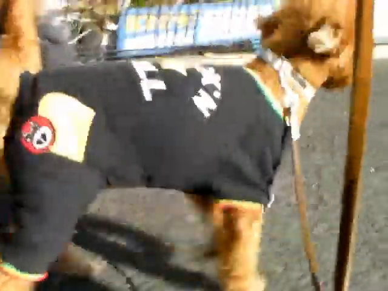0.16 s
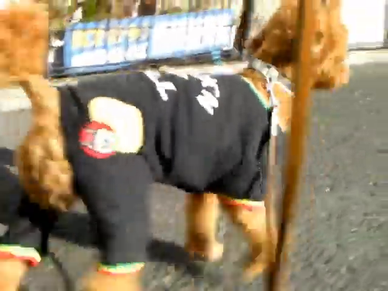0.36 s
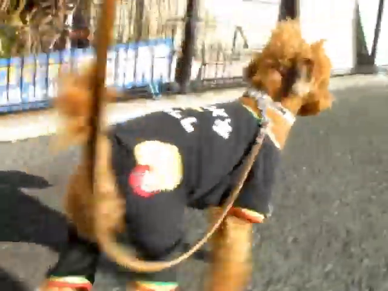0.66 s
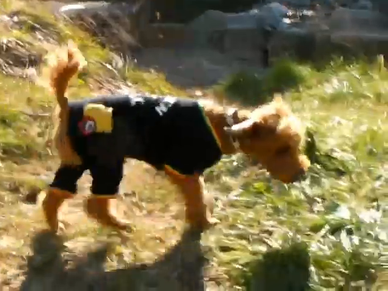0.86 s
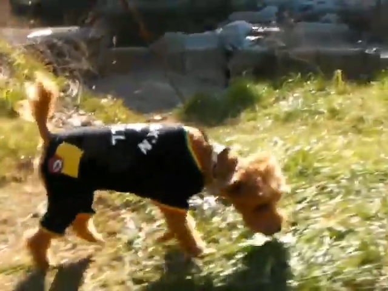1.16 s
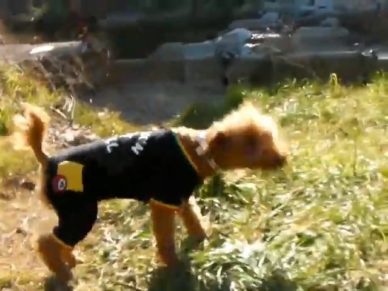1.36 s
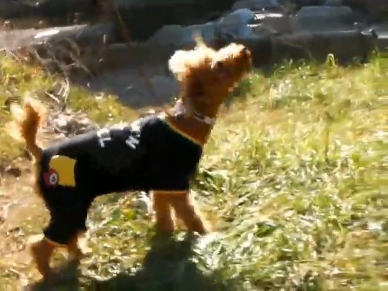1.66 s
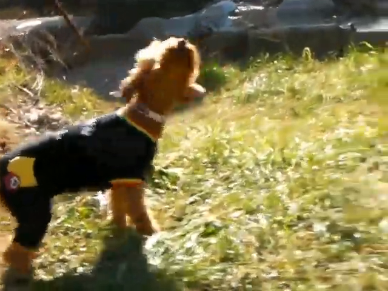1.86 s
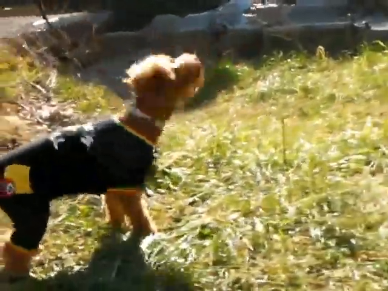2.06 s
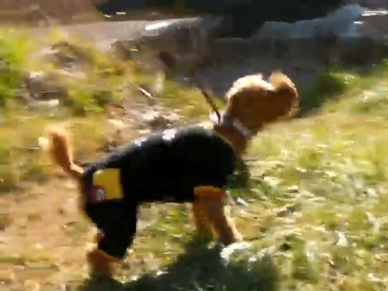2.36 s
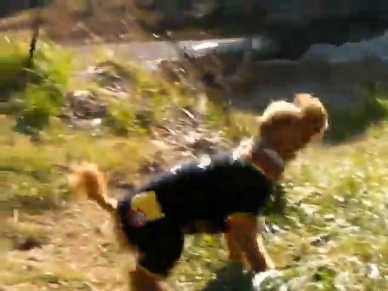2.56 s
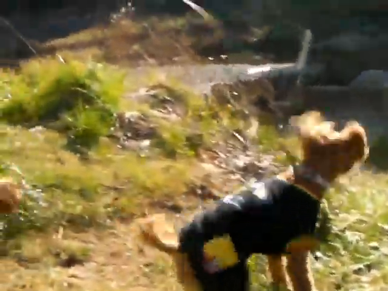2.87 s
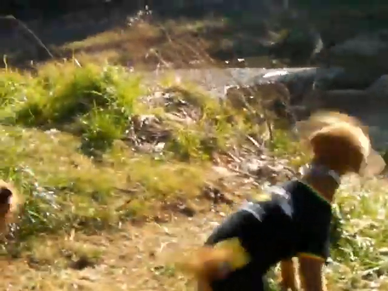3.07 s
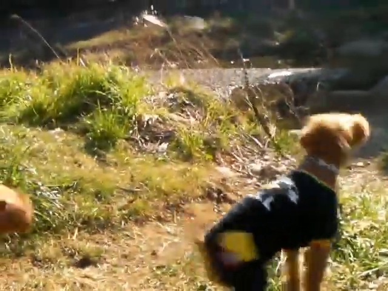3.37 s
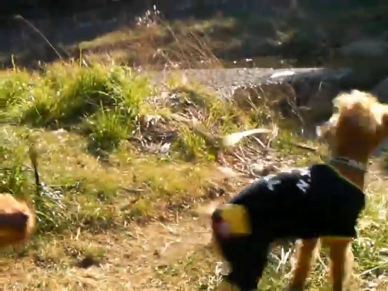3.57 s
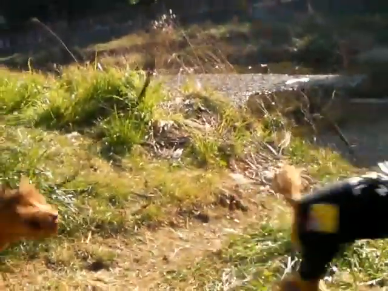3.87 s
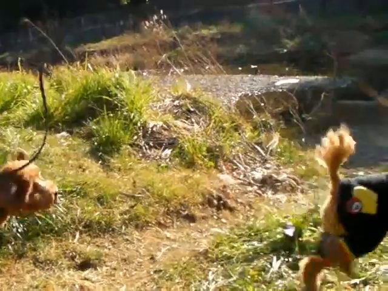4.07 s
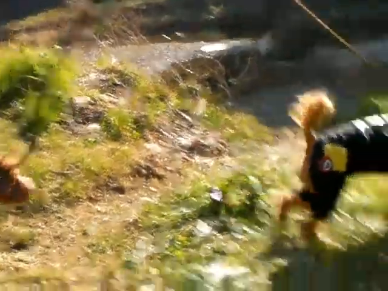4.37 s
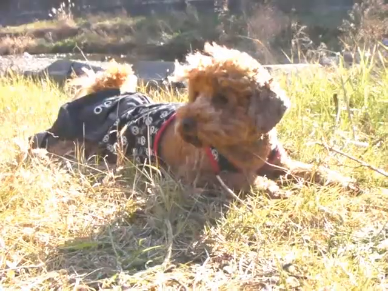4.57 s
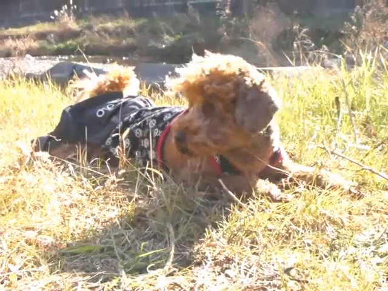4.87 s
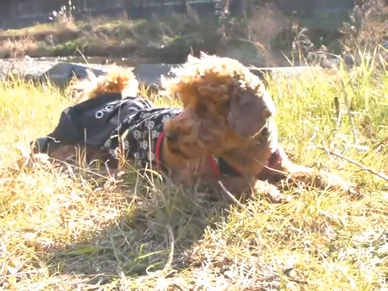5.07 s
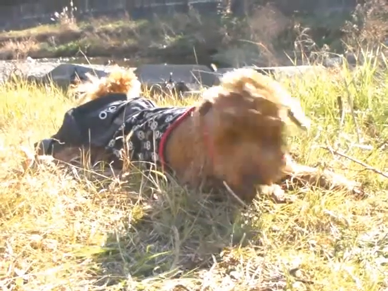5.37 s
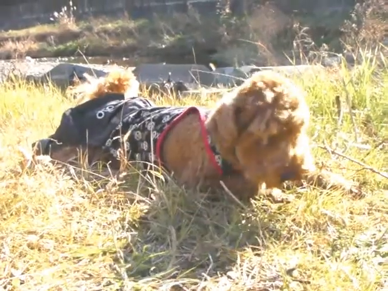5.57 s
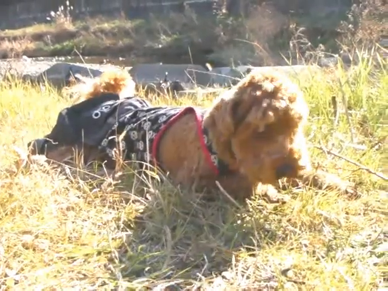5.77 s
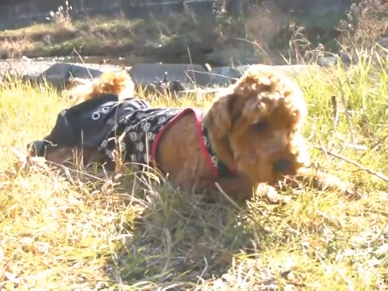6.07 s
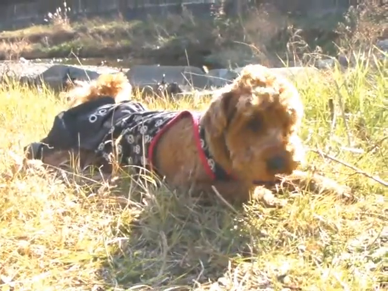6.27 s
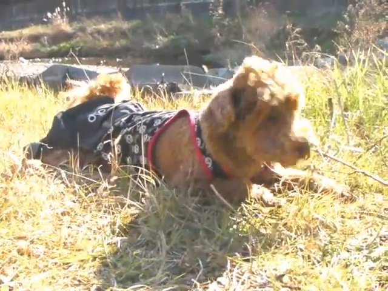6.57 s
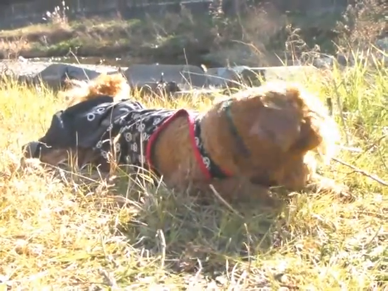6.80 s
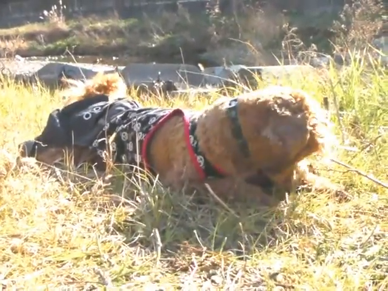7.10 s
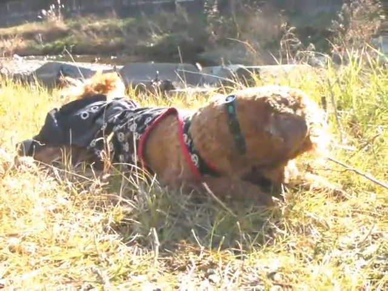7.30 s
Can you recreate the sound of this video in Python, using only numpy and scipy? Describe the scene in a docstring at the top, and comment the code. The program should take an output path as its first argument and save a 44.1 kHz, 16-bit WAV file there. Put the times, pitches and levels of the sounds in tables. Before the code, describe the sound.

Dogs' claws click on pavement, then dry grass and twigs rustle and snap with collar jingles, giving way to a softly flowing river.

```python
"""Dogs on a walk to the river

Dogs trot along a paved street, claws clicking over the traffic hum. With their walker they push through dry
grass and twigs by a river: blades rustle, stalks snap and ring, collar and leash rattle. The sound is muted
briefly and the scene changes to the bank, where a dog lies still while the water washes past with resonating
bubbles. The ports of a small microphone ring and notch all of it."""
import sys
import numpy as np
from scipy import signal
from scipy.fft import rfft, irfft
from scipy.io import wavfile
from scipy.ndimage import uniform_filter1d, map_coordinates

SR = 44100
rng = np.random.default_rng(int(sys.argv[2]) if len(sys.argv) > 2 else 0)


def master(y):
    """Save y as 16-bit WAV."""
    cut = np.clip(np.atleast_2d(y).T, -1, 1)
    pcm = np.round(cut * 32767)  # scale
    wavfile.write(sys.argv[1], SR, pcm.astype(np.int16))


N = 328104
T = np.arange(N) / SR
STREET_S, MEADOW_S, BANK_S = (0, .776), (.776, 4.444), (4.529, 7.44)  # start and end of each place
TWIGS_FROM_S = 2.3

# Claw clicks and breaking stalks: (t/s, f/Hz, then level/dB of the main modes, the dull click,
# the woody modes, the thin modes and the finest modes)
SNAP_EVENTS = [(0.0298, 5970, -36, -53, -59, -60, -65), (0.0503, 6140, -43, -43, -47, -48, -65),
               (0.0802, 6760, -36, -49, -40, -38, -45), (0.0953, 5640, -43, -43, -36, -39, -52),
               (0.1058, 6540, -33, -53, -57, -61, -53), (0.1322, 6760, -37, -46, -50, -37, -40),
               (0.1381, 6650, -37, -54, -42, -32, -32), (0.2716, 6480, -45, -54, -51, -50, -63),
               (0.2774, 6140, -36, -50, -31, -44, -49), (0.3278, 6750, -28, -52, -38, -24, -41),
               (0.341, 5640, -55, -57, -50, -42, -43), (0.4055, 5940, -43, -52, -35, -49, -59),
               (0.4659, 6740, -45, -41, -31, -41, -49), (0.4757, 6740, -38, -42, -41, -37, -37),
               (0.5288, 6720, -33.5, -48, -37, -33, -41), (0.6378, 6570, -28.5, -46, -29, -25, -34),
               (0.665, 6590, -48, -56, -38, -49, -58), (0.6788, 5750, -38, -43, -53, -69, -65),
               (0.7106, 6400, -33, -42, -41, -29, -48), (0.7263, 5800, -55, -58, -50, -38, -55),
               (0.7934, 6440, -34, -52, -44, -35, -56), (1.2634, 6780, -27, -46, -41, -36, -40),
               (1.2761, 6500, -25, -37, -37, -34, -40), (1.3045, 6470, -38, -44, -34, -39, -32),
               (1.3183, 6600, -37, -49, -42, -33, -25), (1.3393, 6240, -32, -50, -40, -43, -43),
               (1.7471, 6630, -34, -40, -37, -38, -38), (1.7893, 6590, -29.5, -33, -25, -41, -50),
               (1.8314, 6800, -31, -45, -43, -35, -45), (1.8925, 6460, -38, -36, -35, -27, -44),
               (1.9498, 6700, -27, -52, -36, -21, -37), (2.0066, 6300, -26, -52, -36, -39, -43),
               (2.0293, 6600, -22, -40, -27, -29, -44), (2.0915, 5880, -35, -55, -41, -38, -33),
               (2.2011, 6700, -14, -46, -30, -22, -32), (2.223, 6570, -18, -43, -36, -30, -33),
               (2.2642, 6120, -25, -40, -41.5, -42, -17), (2.2904, 6600, -26, -42, -40, -37, -43),
               (2.318, 6780, -25, -51, -43, -33, -36), (2.3496, 6050, -24, -55, -41, -35, -55),
               (2.3822, 6760, -18.5, -43, -31, -24, -18), (2.3992, 6590, -23, -49, -33, -32, -35),
               (2.4301, 6440, -26, -53, -37, -19, -14), (2.4682, 6570, -17, -43, -24, -28, -27),
               (2.4774, 6300, -26, -36, -33, -36, -37), (2.5117, 5640, -36, -54, -37, -56, -36),
               (2.5258, 6470, -29, -42, -49, -38, -29), (2.5842, 6370, -20, -45, -22, -34, -31),
               (2.5969, 6770, -20.5, -44, -39, -27, -37), (2.6256, 6400, -21, -42, -30, -33, -28),
               (2.6415, 6140, -18, -49, -35, -22, -48), (2.6481, 6300, -25, -39, -30, -20, -40),
               (2.6537, 6570, -30.5, -44, -34, -32, -38), (2.6786, 5620, -30, -51, -39, -29, -17),
               (2.6918, 6500, -20.5, -38, -28, -30, -23), (2.7008, 6060, -26, -54, -19, -42, -53),
               (2.7062, 6600, -25, -40, -25, -27, -18), (2.7177, 6500, -6.5, -39, -14, -19, -20),
               (2.728, 6300, -17, -40, -23, -26, -27), (2.7414, 6270, -27, -50, -43, -51, -55),
               (2.7803, 6420, -31, -43, -29, -35, -43), (2.7955, 6200, -22, -51, -30, -36, -38),
               (2.8323, 6220, -11.5, -39, -18, -6, -4), (2.8528, 6060, -14, -37, -15.5, -21, -23),
               (2.862, 6450, -24, -19.5, -27, -33, -33), (2.8766, 6300, -16, -37, -26, -27, -33),
               (2.9061, 6870, -20.5, -50, -28, -24, -28), (2.9217, 6230, -18, -50, -30, -27, -25),
               (2.9606, 6400, -23, -41, -47, -39, -39), (2.9767, 5660, -45, -22.5, -22, -52, -53),
               (3.011, 6600, -16, -43, -26, -30, -33), (3.0504, 6600, -20, -36, -25, -26, -30),
               (3.0853, 6520, -15.5, -53, -30, -27, -22), (3.0956, 6300, -6, -35, -24, -10, -9),
               (3.1032, 6220, -30, -34, -31, -32, -36), (3.1334, 6400, -19, -53, -29, -33, -37),
               (3.1556, 6100, -20, -48, -22, -31, -37), (3.161, 6300, -25, -35, -24, -35, -39),
               (3.1935, 6310, -19, -45, -35, -31, -29), (3.2015, 7000, -33, -47, -34, -29, -14),
               (3.2174, 6100, -18, -18, -12, -36, -45), (3.2374, 6600, -29, -37, -48, -13, -31),
               (3.264, 6590, -36, -55, -48, -32, -25), (3.2753, 6560, -7.5, -39, -29, -19, -19),
               (3.3139, 6370, -21.5, -44, -27, -27, -37), (3.3191, 5620, -34, -27, -29, -36, -31),
               (3.3537, 6200, -21, -36, -19.5, -24, -16), (3.3588, 6350, -22, -47, -33, -34, -28),
               (3.386, 6540, -22, -22, -20, -38, -36), (3.39, 6330, -22, -35, -29, -20, -22),
               (3.4208, 6760, -19, -38, -26, -19, -33), (3.4363, 6260, -8, -29, -8.5, -6, -15),
               (3.4866, 6550, -10.5, -39, -28, -11, -14), (3.4985, 6310, -25, -48, -37, -39, -39),
               (3.5439, 6300, -15, -10.5, -7, -23, -23), (3.5489, 6700, -12, -22, -17, -28, -15),
               (3.6263, 6930, -9.5, -32, -16, -13, -14), (3.6657, 6270, -29, -53, -48, -30, -31),
               (3.7018, 6630, -24.5, -34, -22, -35, -43), (3.724, 6910, -32, -42, -21.5, -41, -46),
               (3.7541, 5660, -31, -28, -23, -51, -53), (3.7713, 6230, -22, -31, -27, -35, -28),
               (3.7866, 5620, -25, -36, -28, -29, -37), (3.8117, 6520, -7.5, -53, -32, -12, -12),
               (3.833, 6400, -20, -35, -28, -26, -26), (3.8407, 7000, -21, -42, -25, -21, -25),
               (3.9105, 6200, -24.5, -42, -25, -34, -48), (3.9704, 5990, -36, -42, -32, -34, -12),
               (3.9802, 6900, -23.5, -41, -27, -25, -16), (3.999, 6400, -42, -44, -37, -22, -37),
               (4.048, 6590, -7, -31, -12, -9, -13), (4.2222, 6460, -35, -42, -39, -47, -55),
               (4.2336, 6350, -29, -47, -33, -28, -47), (4.3322, 6700, -29, -54, -47, -50, -52),
               (4.3379, 6670, -26.5, -57, -26, -42, -46), (4.3941, 6530, -27, -58, -33, -33, -48),
               (4.8735, 6350, -40, -44, -49, -65, -68), (5.1913, 6070, -41, -61, -51, -61, -65),
               (5.2976, 6040, -46, -48, -41, -65, -65), (5.7452, 6640, -39, -54, -28, -60, -64),
               (6.1244, 6000, -48, -48, -42, -65, -65), (6.3778, 5900, -48, -46, -38, -65, -67),
               (6.9931, 6200, -55, -59, -42, -65, -65), (7.1244, 6240, -40, -54, -42, -57, -65)]


def undb(db):
    """Amplitude ratio of a level in decibels."""
    return 10 ** (np.asarray(db) / 20)


def unit(x):
    """Normalisation to an RMS of one."""
    return x / np.sqrt(np.mean(x ** 2))


def band(x, lo_hz, hi_hz, order=2):
    """Butterworth band-pass filter."""
    return signal.sosfilt(signal.butter(order, [lo_hz, hi_hz], "band", fs=SR, output="sos"), x)


def curve(table):
    """Linear interpolation of (t/s, value) rows at every sample."""
    return np.interp(T, *np.transpose(table))


def on_log_hz(hz, table, column=1):
    """Interpolation of one column over logarithmic frequency."""
    table = np.array(table)
    return np.interp(np.log(hz + 1), np.log(table[:, 0]), table[:, column])


def add(out, s, sound):
    """Superposition: mix a sound in at time s."""
    i = int(s * SR)
    out[..., i:i + sound.shape[-1]] += sound[..., :N - i]


def ring(modes, hz_scale=1., size=SR // 4):
    """Free vibration: a sum of damped sines, one for each mode (f/Hz, level/dB, T60/s)."""
    t = T[:size]
    return sum(undb(db - 60 * t / t60) * np.sin(2 * np.pi * hz * hz_scale * t) for hz, db, t60 in modes)


def attack(rise_s, size=SR // 4):
    """Linear onset of a vibration."""
    return np.minimum(T[:size] / rise_s, 1)


def wash(spectrum, patchy_db, patch_s, left_lag_samples=0.):
    """Distant sound field: partly coherent stereo noise whose third-octave bands fluctuate separately."""
    hz, s, noise = signal.stft(rng.standard_normal((2, N)), SR, nperseg=1024)
    coherence = on_log_hz(hz, spectrum, column=2)[:, None]
    mid, side = noise[0] * np.sqrt(1 + coherence), noise[1] * np.sqrt(1 - coherence)
    grid = np.meshgrid(3 * np.log2(hz / 20 + 1), s / patch_s, indexing="ij")
    patches = map_coordinates(rng.standard_normal((40, 400)), grid, order=1, mode="wrap")
    gain = undb(on_log_hz(hz, spectrum)[:, None] + patchy_db * patches)
    delay = np.exp(-2j * np.pi * hz * left_lag_samples / SR)[:, None]
    out = signal.istft(np.array([(mid + side) * delay, mid - side]) * gain, SR, nperseg=1024)[1][:, :N]
    return out / band(out.mean(0), 60, 1500).std()


def street():
    """Traffic hum: broadband noise with a slowly modulated bass."""
    # Distant street noise: (f/Hz, relative level/dB, left-right coherence)
    spectrum = [(20, -32, .6), (55, -9, 0.4), (118, 3.5, 1), (192, -5.5, 0.88), (346, -2, 0.97),
                (1030, -6, 0.94), (1970, -13, 0.89), (3360, -21.5, 0.35), (6960, -29, 0), (12400, -36.5, 0),
                (13600, -70, .2)]
    # Gain of the traffic bass: (t/s, level/dB)
    rumble = [(0, -1), (.3, -2), (.4, 2.5), (.58, 2), (.64, 6.5), (.776, 5.5)]
    hum = wash(spectrum, patchy_db=0.88, patch_s=0.076)
    bass = signal.sosfilt(signal.butter(2, 300, fs=SR, output="sos"), hum)
    return (hum + (undb(curve(rumble)) - 1) * bass) * undb(-40)


def meadow():
    """At a distance the river's many sources merge into noise, which fades slightly along the way."""
    # The river across the grass: (f/Hz, relative level/dB, left-right coherence)
    spectrum = [(20, -46, 0.59), (55, -5, 0.99), (107, -6, .85), (200, 2, 0.96), (312, 2.5, 0.99),
                (385, -6.5, 0.89), (996, -8, 0.87), (2700, -15, 0.8), (5860, -19, 0.11),
                (12800, -30.5, 0.081), (14200, -72, .2)]
    return wash(spectrum, patchy_db=2.0, patch_s=.07) * undb(np.interp(T, MEADOW_S, [-40, -41.5]))


def bubbles(count, size_db, cycles, lo_hz, hi_hz):
    """Bubble resonance: each air bubble is a damped oscillator whose pitch rises as it surfaces."""
    out = np.zeros((2, N))
    for when, pitch, size, pan in rng.random((count, 4)):
        hz = lo_hz * (hi_hz / lo_hz) ** pitch
        periods = np.arange(int(3 * cycles * SR / hz)) * hz / SR
        envelope = np.minimum(periods, 1) * np.exp(-2 * periods / cycles)
        blip = envelope * np.sin(2 * np.pi * periods * (1 + 0.05 * periods / cycles))
        gain = undb(-size_db * np.log(1 - .97 * size)) * (lo_hz / hz) ** .5
        add(out, when * N / SR, gain * np.outer([pan + 1, 2 - pan], blip))
    return unit(out)


def river_bank():
    """Flow noise reaches the right port first; bubbles resonate in it, the smallest as a high fizz."""
    # Water passing the bank: (f/Hz, relative level/dB, left-right coherence)
    spectrum = [(20, -44, .9), (53.7, -5.5, 0.93), (127, 2, 0.99), (274, -6.5, 0.91), (794, -11, 0.88),
                (1090, -14, 0.86), (2590, -19, 0.94), (4770, -22, 0.34), (6830, -26, 0.75),
                (7600, -30.5, 0.63), (7700, -23, 0.34), (12520, -40, 0.24), (13800, -71, .3)]
    # Swell and ebb of the river: (t/s, relative level/dB)
    flow = [(4.53, 0.5), (5.1, 0), (5.7, 0), (6.1, 0), (6.4, 0.5), (6.8, .5), (7.1, 0), (7.44, 0.5)]
    water = wash(spectrum, patchy_db=1.4, patch_s=0.066, left_lag_samples=2.24)
    babble = bubbles(count=1400, size_db=2.0, cycles=4.3, lo_hz=349, hi_hz=3000)
    fizz = bubbles(count=500, size_db=-1.0, cycles=8.6, lo_hz=3450, hi_hz=6450)
    return (water + undb(-11) * babble + undb(-20.5) * fizz) * undb(-45.5 + curve(flow))


def gurgles():
    """Each nearby gurgle of the water is a single damped resonance."""
    # Gurgles: (t/s, level/dB, f/Hz)
    events = [(5.914, -48, 520), (6.066, -37, 730), (6.329, -28, 696)]
    out = np.zeros(N)
    for s, db, hz in events:
        add(out, s, undb(db) * attack(0.004) * ring([(hz, 0, .035)]))
    return out


def crackle(break_chance, size_db, grain):
    """Noise modulated by random tiny breaks; the less grain (0-1), the more they merge into a swish."""
    breaks = (rng.random(N) < break_chance) * undb(size_db * np.minimum(rng.exponential(size=N), 3))
    envelope = unit(signal.lfilter([1], [1, -.93], breaks ** 2) ** .5)
    return (grain * envelope + 1 - grain) * rng.standard_normal((2, N))


def brushing_db():
    """Incoherent sources add in power: steady brushing plus single sweeps through the blades."""
    # Paws, shoes and leash brushing over ground and grass: (t/s, level/dB)
    steady = [(0, -72), (.77, -76), (.78, -56), (1.2, -45), (1.5, -48.5), (2.02, -50), (2.06, -68),
              (2.3, -41.5), (2.45, -50), (2.7, -47), (2.88, -35.5), (3.15, -46), (3.4, -41), (3.52, -48.5),
              (3.6, -40), (3.9, -46), (4.1, -57), (4.44, -55)]
    # Sweeps: (peak t/s, level/dB, 20 dB rise time/s, 20 dB fall time/s)
    sweeps = [(.112, -50, 0.06, 0.066), (.42, -52.5, 0.078, 0.46), (.87, -40.5, 0.077, 0.027),
              (1.01, -35.5, 0.097, 0.28), (1.412, -50, 0.055, 0.03), (1.954, -40, 0.13, 0.068),
              (2.151, -22, 0.053, 0.11)]
    power = undb(curve(steady)) ** 2
    for s, db, rise_s, fall_s in sweeps:
        below_peak_db = 20 * np.where(T < s, ((s - T) / rise_s) ** 2, (T - s) / fall_s)
        power += undb(db - below_peak_db) ** 2
    return 10 * np.log10(power)


def rustle():
    """Friction noise through the meadow, ending as the scene changes: bright crackle, deeper crunch, a dull
    rush of fur and legs."""
    # Dry blades rubbing: (f/Hz, relative level/dB, left-right coherence)
    spectrum = [(600, -20.5, 0.9), (2010, -23, 0.96), (4000, -2.5, 1), (5470, 0, 0.6), (6340, 0.5, 0.35),
                (9100, 2.5, 0.05), (13340, -12, 0), (14200, 0, .2), (14430, -8.5, .2), (15000, -62.5, .2)]
    hz = np.fft.rfftfreq(N, 1 / SR)
    grain = np.where(T < TWIGS_FROM_S, 0.44, 0.77)  # grass swishes, twigs stay grainy
    coherence = on_log_hz(hz, spectrum, column=2)
    blades = rfft(crackle(break_chance=0.018, size_db=5.3, grain=grain))
    mid, side = blades * np.sqrt([1 + coherence, 1 - coherence]) * undb(on_log_hz(hz, spectrum))
    bright = unit(irfft(np.array([mid + side, mid - side]), N))
    mid, side = band(crackle(break_chance=0.011, size_db=7.7, grain=grain), 900, 5150)
    crunch = unit(np.array([mid + 0.19 * side, mid - 0.26 * side]))
    fur = unit(band(rng.standard_normal(N), 137, 1800))
    level_db = brushing_db()
    crunch_db = -44.5 + 0.6 * (level_db + 40)  # the crunch grows more slowly than the brushing
    return (undb(level_db) * (bright + undb(-14) * fur) + undb(crunch_db) * crunch) * (T < MEADOW_S[1])


def handle_and_tag():
    """Impacts excite natural modes: the hollow leash handle knocks and a collar tag tinks."""
    # Impacts on the handle and on the tag: (t/s, level/dB)
    knocks = [(4.336, -26), (4.357, -24), (4.364, -23), (4.385, -18.5), (4.391, -34), (4.411, -27)]
    tinks = [(4.0138, -31), (4.096, -30.5), (4.1345, -48), (4.2562, -30.5), (4.394, -43.5)]
    # Modes of the handle and of the tag: (f/Hz, relative level/dB, T60/s)
    handle_modes = [(790, 2.5, 0.016), (980, -4.5, 0.011), (650, -10, 0.0145), (1150, -22, 0.0091),
                    (2200, -7.5, 0.011)]
    tag_modes = [(6170, -5, 0.059), (6800, -15, 0.069), (10000, -14, .04)]
    out = np.zeros(N)
    for impacts, modes in ((knocks, handle_modes), (tinks, tag_modes)):
        for (s, db), detune in zip(impacts, rng.standard_normal(len(impacts))):
            add(out, s, undb(db) * attack(0.0011) * ring(modes, 1 + 0.01 * detune))
    return out


def collar_jingle():
    """Each strong jolt among the twigs excites the modes of the collar links in a different mix."""
    # Modes of the links: (f/Hz, relative level/dB, T60/s)
    link_modes = [(3780, 0, .05), (4020, -3, .05), (5652, -2, .2), (6200, -3, .08), (8800, -6, .06),
                  (9900, -8, .05), (10760, -6, .05), (12950, -17, .05), (13600, -13, .04)]
    out = np.zeros(N)
    for s, _, snap_db, *_ in SNAP_EVENTS:
        excitation = rng.standard_normal(len(link_modes))
        if TWIGS_FROM_S < s < MEADOW_S[1] and snap_db > -27:  # weaker snaps leave the collar still
            jolt_db = 0.64 * snap_db - 34
            modes = [(hz * (1 + 0.0013 * stray), db + jolt_db + 4 * stray, t60)
                     for (hz, db, t60), stray in zip(link_modes, excitation)]
            add(out, s, ring(modes))
    return out


def stalk_ring(modes, strays, size):
    """No two stalks vibrate alike: each mode strays in frequency and level."""
    return ring([(hz * (1 + .045 * detune), db + 2.5 * louder, t60)
                 for (hz, db, t60), (detune, louder) in zip(modes, strays)], size=size)


def snaps():
    """A fracture or claw strike excites damped modes, inside a burst of uneven, crumbling noise."""
    # Main modes: (ratio to the snap's frequency, relative level/dB, T60/s)
    main_modes = [(0.982, -6, 0.01), (0.815, -9, 0.0061), (1.23, -8.5, 0.021)]
    # Dull click, then the stalk's low, high and highest modes: (f/Hz, relative level/dB, T60/s)
    click_modes = [(2380, 0, 0.0068), (1740, 5.5, 0.0033)]
    woody_modes = [(3400, -10, 0.0087), (3950, -7.5, 0.009), (4740, -5, 0.0081), (5280, -11, 0.0068)]
    thin_modes = [(8870, -8.5, 0.0093), (9600, -9.5, .007), (10440, -8.5, .007), (11300, -14.5, 0.0052)]
    finest_modes = [(12500, -22, .005), (13400, -17, .006), (13900, -9, 0.0073), (14800, -19, .005)]
    tear_s = .01  # fibres start to tear this long before the break
    t, size, count = T[:SR // 8] - tear_s, SR // 30, len(SNAP_EVENTS)
    fade_db = -60 * np.where(t < 0, -t / .016, t / .065)
    rings, crumbs = np.zeros((2, N)), np.zeros((2, N))
    noises = rng.standard_normal((count, 4, len(t)))
    snap_strays = rng.standard_normal((count, 3))
    mode_strays = rng.standard_normal((count, 3, 4, 2))
    for event, noise, (lag, pan, crumb), strays in zip(SNAP_EVENTS, noises, snap_strays, mode_strays):
        s, hz, db, click_db, woody_db, thin_db, finest_db = event
        pan_db = 0.5 + 3.5 * pan  # left minus right
        sides = undb(np.array([[pan_db], [-pan_db]]) / 2)
        main = undb(db) * ring(main_modes, hz, size)
        click = undb(click_db) * ring(click_modes, size=size)
        woody = undb(woody_db) * stalk_ring(woody_modes, strays[0], size)
        thin = undb(thin_db) * stalk_ring(thin_modes, strays[1], size)
        finest = undb(finest_db) * stalk_ring(finest_modes, strays[2], size)
        add(rings, s, sides * attack(0.00024, size) * (main + click + woody))
        left, right = sides * attack(.0005, size) * (thin + finest)
        add(rings[0], s, left)
        add(rings[1], s + 0.28 * lag / SR, right)  # high modes may reach one port a sample earlier
        lumps_db = 3.5 * unit(uniform_filter1d(noise[3], size=40))
        envelope = undb(db - 15.5 + 1.5 * crumb + fade_db + lumps_db)
        add(crumbs, s - tear_s, sides * envelope * (noise[0] + .5 * noise[1:3]))
    return band(rings, 1300, 15200, order=3) + band(crumbs, 3260, 11240, order=4)


def scene():
    """Superposition of the nearby sources on the backgrounds of three places in turn."""
    places = ((street(), STREET_S), (meadow(), MEADOW_S), (river_bank(), BANK_S))
    background = sum(sound * ((T >= start) & (T < end)) for sound, (start, end) in places)
    return background + gurgles() + rustle() + snaps() + collar_jingle() + handle_and_tag()


def record(dry):
    """Port resonances act as peaking filters, destructive interference as a notch; the top is cut."""
    # Peaks and a dip of the microphone ports and housing: (f/Hz, bandwidth/Hz, gain/dB)
    resonances = [(238, 17.6, -17), (6545, 2300, 8), (11400, 390, 2), (13050, 2200, 17.5)]
    notch_hz, notch_width_hz, top_hz = 7840, 1150, 16300
    for hz, width_hz, db in resonances:
        omega, gain = 2 * np.pi * hz / SR, undb(db / 2)
        alpha = np.sin(omega) * width_hz / hz / 2
        numerator = [1 + alpha * gain, -2 * np.cos(omega), 1 - alpha * gain]
        denominator = [1 + alpha / gain, -2 * np.cos(omega), 1 - alpha / gain]
        dry = signal.lfilter(numerator, denominator, dry)
    edges_hz = notch_hz + notch_width_hz * np.array([-.5, .5])
    notched = signal.sosfilt(signal.butter(2, edges_hz, "bandstop", fs=SR, output="sos"), dry)
    gated = notched * ((T < MEADOW_S[1]) | (T >= BANK_S[0]))  # the sound is muted as the scene changes from meadow to bank
    return signal.sosfilt(signal.ellip(10, .2, 90, top_hz, fs=SR, output="sos"), gated)


dry = scene()
out = record(dry)
master(out)
```